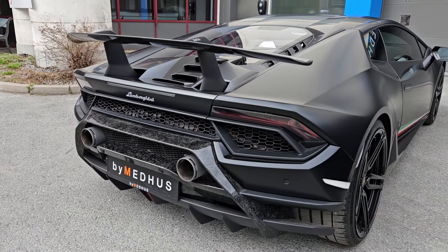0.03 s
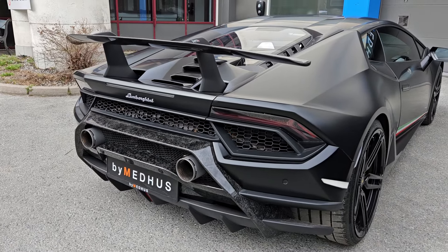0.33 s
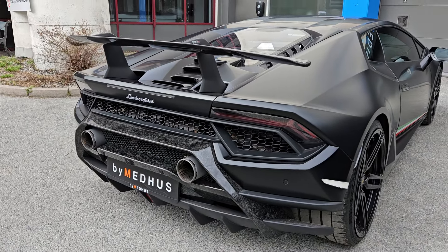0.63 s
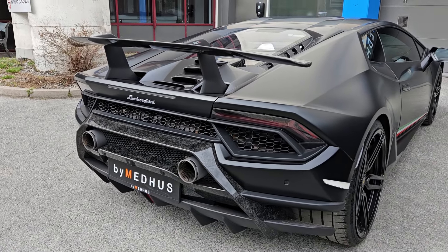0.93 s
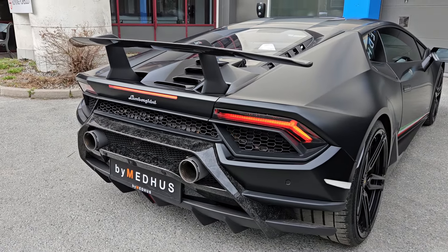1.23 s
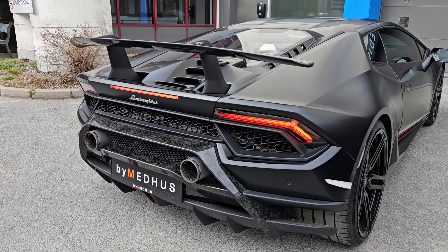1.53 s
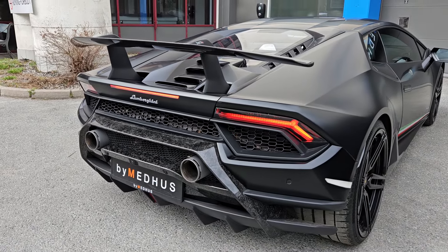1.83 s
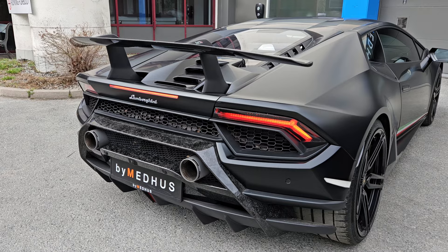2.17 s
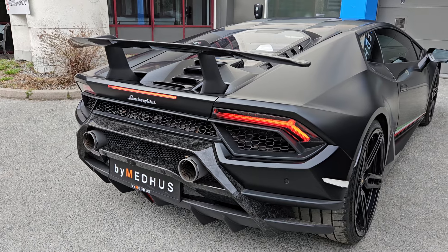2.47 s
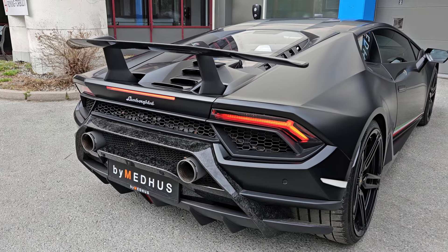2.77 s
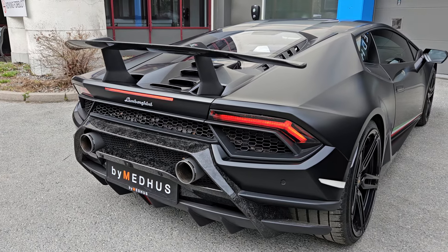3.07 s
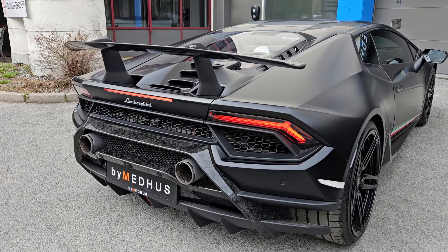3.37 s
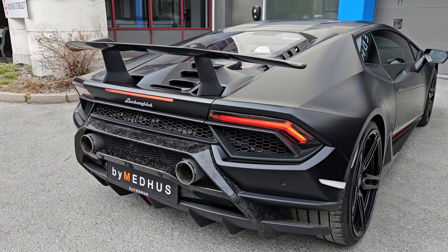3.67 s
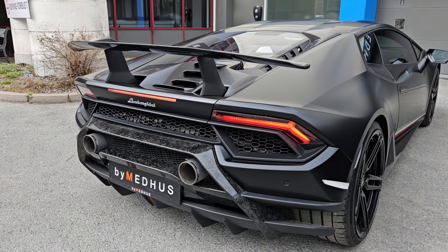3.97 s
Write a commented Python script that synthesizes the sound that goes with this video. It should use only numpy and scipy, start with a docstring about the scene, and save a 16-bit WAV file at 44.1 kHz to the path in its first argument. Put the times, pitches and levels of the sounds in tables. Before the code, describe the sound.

A sports car cranks and fires up close by after a quieter outdoor rumble.

```python
"""A sports car starts on an outdoor lot, the stereo microphone just behind its tailpipes.
First, over distant rumble and small ticks, another vehicle out of sight runs slowly and revs once,
its firings ringing its exhaust. At 3.1 s the starter clacks in and cranks: gear teeth rattle the
housing and the cylinders pump air. At 3.75 s the engine catches with a few deep thumps and flares up,
barking and spitting through the pipes, with a short echo from the buildings."""
import sys
import numpy as np
from scipy import signal
from scipy.fft import rfft, irfft, next_fast_len
from scipy.io import wavfile
from scipy.ndimage import map_coordinates

SR = 44100
rng = np.random.default_rng(int(sys.argv[2]) if len(sys.argv) > 2 else 0)


def to_wav(sig):
    """Store sig (one row per channel, or 1-D mono) as 16-bit WAV at the path in sys.argv[1].

    Samples outside -1..1 are clipped; the rate is SR.
    """
    pcm = np.clip(np.atleast_2d(sig), -1, 1) * 32767
    pcm = np.round(pcm).astype(np.int16)
    wavfile.write(sys.argv[1], SR, pcm.T)  # frames by channels


N = 176400
TIME_S = np.arange(N) / SR


def amp(db):
    """Decibels to gain."""
    return 10 ** (np.asarray(db) / 20)


def unit(x):
    """Scale to rms 1."""
    return x / np.sqrt(np.mean(x ** 2) + 1e-20)


def along(points, hz):
    """Read (freq_hz, value) points on a log frequency axis."""
    freqs, values = np.transpose(points)
    return np.interp(np.log(hz + 1), np.log(freqs + 1), values)


def curves(rows):
    """One value per sample for each column after the time."""
    times, *columns = np.transpose(rows)
    return [np.interp(TIME_S, times, column) for column in columns]


def wobble(rate):
    """A smooth random curve, rate knots a second."""
    return map_coordinates(rng.standard_normal(int(N * rate / SR) + 4), [TIME_S * rate])


def filtered(x, response):
    """Filter x by a complex response of frequency."""
    size = 2 * next_fast_len(N * 2 // 3)
    return irfft(rfft(x, size) * response(np.fft.rfftfreq(size, 1 / SR)), size)[..., :N]


def resonate(x, spectrum):
    """Ring x through a causal filter shaped by (freq_hz, gain_db) points."""
    def minimum_phase(hz):
        cepstrum = irfft(np.log(amp(along(spectrum, hz)) + 1e-6))
        half = len(cepstrum) // 2
        cepstrum[1:half] *= 2
        cepstrum[half + 1:] = 0
        return np.exp(rfft(cepstrum))
    return filtered(x, minimum_phase)


def noise(spectrum, likeness, pan, gate=1):
    """Gated stereo noise of rms 1 with a colour, a width and a balance."""
    def spread(hz):
        angle = np.arccos(np.clip(along(likeness, hz), -1, 1)) / 2
        return np.array([np.cos(angle), np.sin(angle)])
    mid, side = filtered(resonate(rng.standard_normal((2, N)) * gate, spectrum), spread)
    pair = np.array([mid + side, mid - side])
    return unit(filtered(pair, lambda hz: amp(np.outer([.5, -.5], along(pan, hz)))))


def beats(turns):
    """Samples at which a count of turns passes a whole number."""
    return np.flatnonzero(np.diff(np.floor(turns)) > 0)


def pulses(turns, scatter_db):
    """One pulse a turn, of scattered size."""
    at = beats(turns)
    return np.bincount(at, amp(scatter_db * rng.standard_normal(len(at))), N)


def strike(start_s, t60_s, attack_s):
    """Envelope of a blow: a quick rise, then 60 dB down in t60_s."""
    age = np.maximum(TIME_S - start_s, 0)
    return (1 - np.exp(-age / attack_s)) * amp(-60 * age / t60_s)


# The lot, far from the microphone.
RUMBLE_SPECTRUM = [(20,-0.5),(40,-5.5),(70,3),(130,2),(270,-6.5),(500,-12),(800,-19.5),(1300,-52)]  # freq_hz, gain_db
RUMBLE_LIKENESS = [(60, 0.88), (150, 1), (380, 0.86), (950, 0.23), (2380, -0.27), (5980, -0.38),
                   (15000, -0.71)]  # freq_hz, left_right_correlation
LOT_PAN = [(60, 3.5), (150, -2), (380, 0), (950, -1.0), (2380, -7.5), (5980, -3), (15000, 6)]  # freq_hz, left_minus_right_db


def distant_rumble():
    """A steady low rumble behind everything."""
    return amp(-34) * noise(RUMBLE_SPECTRUM, RUMBLE_LIKENESS, LOT_PAN)


# Small sounds around the lot.
KNOCKS = [(.297,-29,1500,.055),(.547,-40,10000,.055),(.851,-32,2200,.045),(.883,-33.5,1300,.05),(1.505,-32,1050,.03),(2.245,-31,3000,.03)]  # start_s, level_db, centre_hz, t60_s
KNOCK_SHAPE = [(.2,-30),(.6,-8),(1,0),(1.4,-9),(2.2,-22),(7,-44)]  # ratio_to_centre, gain_db
SHARP_TICKS = [(.642,-46),(1.357,-49),(1.460,-47),(1.471,-47.5),(1.493,-47),(1.508,-45.5),(1.710,-45.5),(2.101,-44),(2.245,-42.5)]  # start_s, level_db
TICK_SPECTRUM = [(3000,-20),(7500,0),(12000,-2),(15600,-10)]  # freq_hz, gain_db
LOT_LIKENESS = [(500,0.12),(2000,0.45),(8000,0.088)]  # freq_hz, left_right_correlation


def knocks_and_ticks():
    """Faint knocks and finer ticks, each a burst of noise that dies quickly."""
    knocks = 0
    for start_s, db, centre_hz, t60_s in KNOCKS:
        spectrum = [(centre_hz * ratio, gain) for ratio, gain in KNOCK_SHAPE]
        knocks += amp(db) * strike(start_s, t60_s, .0003) * noise(spectrum, LOT_LIKENESS, LOT_PAN)
    ticks = sum(amp(db) * strike(s, t60_s=.016, attack_s=.0002) for s, db in SHARP_TICKS)
    return knocks + ticks * noise(TICK_SPECTRUM, LOT_LIKENESS, LOT_PAN)


# The exhaust of the vehicle out of sight.
HUM_LEVELS = [(0,-33,-42,-31,-42,-37),(.25,-31,-44,-38,-46,-44),(.55,-29,-44,-29,-44,-36),(.85,-32,-44,-34,-46,-42),(1.1,-34,-48,-44,-48,-46),(1.52,-33,-48,-36,-48,-44),(1.68,-33,-48,-42,-48,-43),(1.85,-27,-46,-39,-46,-43),(2.03,-26,-40,-33,-42,-35),(2.15,-27,-27,-20,-36,-32),(2.42,-18,-23,-17,-34,-25),(2.58,-25,-27,-19,-31,-33),(2.8,-34,-29,-19,-24,-30),(3.07,-38,-32,-22,-27,-29),(3.12,-31,-44,-42,-44,-41)]  # time_s, then level_db of engine orders 2 to 6
RING_LEVELS = [(0,-53,-52.5,-55),(.32,-53,-52,-52),(.5,-68,-41.5,-56),(.8,-40.5,-41.5,-57),(1.1,-39,-53,-52.5),(1.7,-40,-54,-62),(2.031,-39.5,-45,-50),(2.13,-30.5,-39.5,-46),(2.45,-34,-34.5,-41.5),(2.6,-33.5,-31,-43),(2.72,-28,-27.5,-39.5),(2.86,-38.5,-32,-45.5),(3.08,-33,-29,-45),(3.12,-42,-40.5,-49)]  # time_s, low_db, middle_db, high_db
PIPE_RINGS = [391.6, 438.1, 644]  # pitch_hz of the low, middle and high resonance
RING_SHAPE = [(.4,-61),(.8,-20),(.95,-3.5),(1,6.5),(1.05,-0.5),(1.2,-25),(2.6,-64),(6,-110)]  # ratio_to_pitch, gain_db
DRONE_LEVEL = [(0,-37),(.7,-47.5),(1,-43),(1.7,-43.5),(2,-41.5),(2.2,-30),(2.45,-34),(2.7,-30.5),(3.08,-36.5),(3.15,-40.5),(4,-42)]  # time_s, level_db
DRONE_SPECTRUM = [(60,-31.5),(120,1),(155,-0.5),(185,3.5),(230,3.5),(290,-7),(400,-25.5),(1200,-110)]  # freq_hz, gain_db


def other_exhaust(turns):
    """An uneven engine: low orders hum, and its strong and weak firings ring the pipe."""
    hum = 0
    for order, db in enumerate(curves(HUM_LEVELS), 2):
        pipe_delay_rad = .75 * order ** 2
        hum += np.sqrt(2) * amp(db + wobble(22.41)) * np.cos(2 * np.pi * order * turns - pipe_delay_rad)
    hum *= np.interp(TIME_S, [3.15, 3.7], [1, .6])
    strong = pulses(turns, scatter_db=1)
    weak = .25 * pulses(turns + .5 - .07, scatter_db=2)  # 0.07 cycle later than halfway
    firings = unit(strong + weak) + .2 * rng.standard_normal(N)
    ring = 0
    for pitch_hz, db in zip(PIPE_RINGS, curves(RING_LEVELS)):
        ring += amp(db) * unit(resonate(firings, [(pitch_hz * r, gain) for r, gain in RING_SHAPE]))
    drone = amp(curves(DRONE_LEVEL)[0]) * unit(resonate(firings, DRONE_SPECTRUM))
    return hum + ring + drone


# The same vehicle's machinery, off across the lot.
HISS_LEVELS = [(0,-44.5,-61),(.3,-41,-56.5),(.62,-39,-51),(1.1,-40.5,-53),(1.6,-41.5,-54),(2.05,-38.5,-50.5),(2.25,-37,-47),(2.6,-38,-51),(3.1,-42,-53.5)]  # time_s, hiss_db, treble_db
HISS_SPECTRUM = [(440, -3), (750, -0.5), (836, -2.5), (1050, -1.5), (1250, -5), (1780, -7), (1940, -4),
                 (2040, -1), (2370, -7.5), (3200, -8), (3450, -10.5), (4320, -13), (5500, -30), (7150, -67),
                 (12100, -120)]  # freq_hz, gain_db
TREBLE_SPECTRUM = [(2650,-31.5),(4500,3.5),(5400,-0.5),(7200,-1.5),(8900,-9),(9700,-20),(12000,-11.5),(15600,-31)]  # freq_hz, gain_db
WHIRR = [(.2,1700,-55),(.5,2530,-50),(.85,3159,-53),(1.3,3100,-63),(1.8,3176,-72)]  # time_s, pitch_hz, level_db


def other_machinery(turns):
    """Clattering mechanical hiss, and a faint whirr that rises and settles."""
    hiss_db, treble_db = curves(HISS_LEVELS)
    clatter = amp(.27 * np.cos(4 * np.pi * turns) + .93 * wobble(150))
    hiss = amp(hiss_db) * noise(HISS_SPECTRUM, LOT_LIKENESS, LOT_PAN, clatter)
    treble = amp(treble_db) * noise(TREBLE_SPECTRUM, LOT_LIKENESS, LOT_PAN, clatter)
    whirr_hz, whirr_db = curves(WHIRR)
    blur = wobble(340) + 1j * wobble(340)  # widens the tone to a narrow band
    whirr = amp(whirr_db) * np.real(blur * np.exp(2j * np.pi * np.cumsum(whirr_hz) / SR))
    return hiss + treble + whirr


# That vehicle's speed, its bearing from the microphone and its thin whine.
OTHER_SPEED = [(0,27.8),(.12,26.3),(.25,25.7),(.55,26.8),(.75,25.5),(1,23.7),(1.3,22.4),(1.68,24.2),(1.82,25),(1.98,28),(2.1,31),(2.25,33.6),(2.42,37),(2.52,33.9),(2.62,32.1),(2.76,29),(2.86,27),(3.05,27),(3.2,27.5)]  # time_s, cycle_rate_hz
OTHER_LAG = [(.7,-7),(1.6,-21),(2.9,-23),(3.3,-10)]  # time_s, left_lag_samples (negative: left leads)
WHINE_LEVEL = [(0,-51),(.33,-42.5),(.45,-48),(1.66,-61),(1.76,-41),(1.9,-65)]  # time_s, level_db


def other_vehicle():
    """It runs slowly and revs once, its sound reaching the left channel first."""
    def placed(pair, lag):
        return np.array([map_coordinates(channel, [np.arange(N) + side * lag])
                         for channel, side in zip(pair, (-.5, .5))])
    cycle_hz, = curves(OTHER_SPEED)
    lag, = curves(OTHER_LAG)
    turns = .5 + np.cumsum(cycle_hz * (1 + .005 * wobble(25))) / SR
    exhaust = placed([other_exhaust(turns)] * 2, .43 * lag)  # the low note lags less
    machinery = placed(other_machinery(turns), lag)
    whine = amp(curves(WHINE_LEVEL)[0]) * np.sin(2 * np.pi * 633 * TIME_S + .5 * wobble(24))
    return exhaust + machinery + whine


def building_echo(x, t60_s=.18, delay_s=.012):
    """A short, thin echo from the buildings around the lot."""
    t = np.arange(SR // 2) / SR
    tail = rng.standard_normal((2, len(t))) * amp(-60 * t / t60_s) * (t > delay_s)
    echo = signal.fftconvolve(x, tail / np.linalg.norm(tail[0]), axes=1)[:, :N]
    return filtered(echo, lambda hz: amp(along([(120, -5), (500, 1.5), (4000, 2), (14000, -1)], hz)))


# The sports car's stereo image, close up.
CAR_LIKENESS = [(60, 1), (380, 0.81), (950, 0.44), (2380, 0.054), (5980, -0.11), (15000, 0.019)]  # freq_hz, left_right_correlation
CAR_PAN = [(150, -1.5), (380, 1.5), (950, -2.5), (2380, 3.5), (5000, -8), (8000, -2), (13000, 4)]  # freq_hz, left_minus_right_db


def car_noise(spectrum, gate=1):
    """Noise with the width and balance of the car."""
    return noise(spectrum, CAR_LIKENESS, CAR_PAN, gate)


# The starter engaging, heard from behind the car.
CLACKS = [(3.131,-24.5,0.065),(3.139,-16.5,0.1),(3.161,-19,0.045)]  # start_s, level_db, t60_s
CLACK_SPECTRUM = [(240, -34), (400, 1), (705, -14), (1050, -3), (1500, -16), (1610, -5.5), (2260, -11),
                  (2940, -10.5), (4240, -9), (4800, -3), (6820, -11.5), (12600, -21), (15600, -29)]  # freq_hz, gain_db


def starter_clack():
    """The pinion clacks in with three quick blows."""
    blows = sum(amp(db) * strike(s, t60_s, attack_s=.0031) for s, db, t60_s in CLACKS)
    return blows * car_noise(CLACK_SPECTRUM, gate=amp(1.3 * wobble(700)))


# The starter's gears and their housing.
CRANK_LEVEL = [(3.13,-80),(3.16,-26),(3.2,-36.5),(3.335,-38),(3.368,-32.5),(3.43,-37.5),(3.452,-34),(3.497,-42.5),(3.51,-32),(3.555,-32.5),(3.612,-38.5),(3.635,-30.5),(3.66,-32),(3.69,-35.5),(3.74,-38),(3.78,-30.5),(3.9,-47)]  # time_s, level_db
GEAR_SPECTRUM = [(180, -24), (300, -8), (426, -3.5), (541, -35.5), (653, -8.5), (721, -11), (1060, -7.5),
                 (1350, -9.5), (2340, -6.5), (3680, -20.5), (6000, -24), (7800, -52), (13200, -120)]  # freq_hz, gain_db
FIZZ_SPECTRUM = [(2940, -4.5), (5000, -1.5), (6170, -7.5), (7050, -8.5), (9650, -15), (12000, -14.5),
                 (15600, -31)]  # freq_hz, gain_db
HOUSING_MODES = [(661.7, 27, 0), (853, 24, 3), (1074.8, 22, 8), (1241, 24, 2.5), (1457, 28, 4.5),
                 (1910, 40, -3), (2223, 37, 2), (2357, 42, 4), (3106, 54, -1.5), (4730, 39, -8.5)]  # pitch_hz, width_hz, gain_db


def starter_gears(mesh_hz=203.6):
    """Gear teeth whirr and rattle the housing, surging with each compression."""
    def housing(hz):
        return (hz < 6500) * sum(amp(db) * 1j * hz * width / (pitch ** 2 - hz ** 2 + 1j * hz * width)
                                 for pitch, width, db in HOUSING_MODES)
    turns = np.cumsum(mesh_hz * (1 + .1 * wobble(40))) / SR
    # The level swings with each tooth, a fast rattle and a slow shudder.
    teeth = amp(1.5 * np.cos(2 * np.pi * turns) + 2.3 * wobble(130) + 1.6 * wobble(30))
    impacts = teeth * (unit(pulses(turns, scatter_db=1)) + rng.standard_normal((2, N)))
    ring = amp(-2.5) * unit(filtered(impacts, housing))
    whirr = car_noise(GEAR_SPECTRUM, teeth)
    fizz = amp(-5.5 + 11 * (TIME_S - 3.5)) * car_noise(FIZZ_SPECTRUM, teeth)  # brightens as it cranks
    return amp(curves(CRANK_LEVEL)[0]) * (whirr + ring + fizz)


def thump(start_s, pitch_hz, rise_s=.0031, hold_s=.005, fall_s=.0073):
    """A slug of gas sets the tailpipe swinging for a cycle or two."""
    age = TIME_S - start_s
    rise = np.exp(-(np.minimum(age - hold_s / 2, 0) / rise_s) ** 2)
    fall = np.exp(-np.maximum(age - hold_s, 0) / fall_s)
    return -rise * fall * np.cos(2 * np.pi * pitch_hz * age)


# Unfired air leaving the tailpipes, right at the microphone.
CHURN_SPECTRUM = [(25,-36.5),(55,9.5),(110,5.5),(170,6.5),(260,0),(380,-3),(480,-10.5),(800,-35.5)]  # freq_hz, gain_db
PUFFS = [(3.132,-22,94),(3.183,-41,107),(3.392,-14.5,42.12),(3.451,-20,44.9),(3.533,-16.5,49.12)]  # start_s, level_db, pitch_hz


def pumped_air():
    """A low churn swells and the pipes puff as the cranked cylinders pump air."""
    swell = np.interp(TIME_S, [3.12, 3.17, 3.55, 3.75], [.14, 1, .6, .68])
    puffs = sum(amp(db) * thump(s, hz) for s, db, hz in PUFFS)
    return amp(-30) * swell * car_noise(CHURN_SPECTRUM) + puffs


# The engine running up, just ahead of the microphone.
RUN_UP = [(3.75,39.6,92,-5,-41,-43,-32.5),(3.778,33,100,1,-41,-46.5,-30.5),(3.797,30.8,110,-8,-36,-35,-31),(3.822,42,142,5,-35,-25,-26),(3.843,51,162,-10.5,-14,-26,-26.5),(3.878,61.6,202,-8,-18,-23,-30),(3.92,72.2,220,-17,-11.5,-23.5,-28),(3.96,90.6,222,-15,-14.5,-22,-33.5),(4,94,234,-21,-16.5,-26,-33)]  # time_s, firing_hz, pipe_hz, thump_db, boom_db, rasp_db, spit_db
RASP_SPECTRUM = [(200,-28),(330,-9.5),(430,-10),(520,2),(590,-9),(680,-4.5),(800,-12.5),(950,-12),(1130,-8),(1350,-30),(1550,-15.5),(2000,-29.5),(3000,-34.5)]  # freq_hz, gain_db
SPIT_SPECTRUM = [(820, -47), (1400, -10.5), (1550, -2), (1930, -13.5), (2250, 3), (2780, -13.5), (3330, -5),
                 (3880, -12), (4610, -7.5), (5100, -10), (5690, -4.5), (7710, -16), (9620, -16.5),
                 (12800, -18), (15600, -34.5)]  # freq_hz, gain_db


def engine(catch_s=3.7525):
    """Single thumps speed up into a boom; each firing drives a gust of rasp and spit down the pipes."""
    firing_hz, pipe_hz, thump_db, boom_db, rasp_db, spit_db = curves(RUN_UP)
    turns = np.cumsum(firing_hz) / SR
    turns -= np.interp(catch_s, TIME_S, turns)  # zero at the first firing
    alight = np.clip(2 * turns + 1, 0, 1)
    firings = beats(np.maximum(turns, -.5))
    thumps = sum(amp(thump_db[i]) * thump(TIME_S[i], pipe_hz[i]) for i in firings)
    boom = -np.sqrt(2) * amp(boom_db) * np.cos(2 * np.pi * turns)
    gust_db = 4.6 * np.cos(2 * np.pi * (turns - .2)) + .82 * np.cos(4 * np.pi * turns)
    gust = amp(gust_db + .73 * wobble(600))
    rasp = amp(rasp_db) * car_noise(RASP_SPECTRUM, gust)
    spit = amp(spit_db) * car_noise(SPIT_SPECTRUM, gust)
    return thumps + alight * (boom + rasp + spit)


# Hard firings at the mouth of the tailpipes.
BARKS = [(3.789,-17,1070,-15),(3.814,-16.5,453,-23),(3.837,-10,512,-18),(3.8505,-9.5,524,-28.5),(3.8575,-10,518,-23.5),(3.884,-10.5,517,-33),(3.8895,-11.5,542,-25.5),(3.9283,-4.5,600,-19),(3.9405,-6,502,-24.5),(3.9805,-6.5,492,-28)]  # start_s, bark_db, pitch_hz, crack_db


def exhaust_barks():
    """Each hard firing rings the pipes with a gritty note and a bright crack."""
    grit = amp(-5.5) * car_noise(RASP_SPECTRUM)
    spit = car_noise(SPIT_SPECTRUM)
    barks = 0
    for start_s, bark_db, pitch_hz, crack_db in BARKS:
        ring = -np.sin(2 * np.pi * pitch_hz * (TIME_S - start_s))
        barks += amp(bark_db) * strike(start_s, t60_s=.04, attack_s=.0017) * (ring + grit)
        barks += amp(crack_db) * strike(start_s, t60_s=.036, attack_s=.0012) * spit
    return barks


def scene():
    """The lot and the other vehicle behind, the sports car close by."""
    background = distant_rumble() + knocks_and_ticks() + other_vehicle()
    car = starter_clack() + starter_gears() + pumped_air() + engine() + exhaust_barks()
    return background + amp(-16.5) * building_echo(car) + car


def record(dry, top_hz=15850):
    """The recorder rounds off peaks near full scale and keeps nothing above its band limit."""
    rounded = dry / (1 + np.abs(dry) ** 8) ** (1 / 8)
    return filtered(rounded, lambda hz: hz < top_hz)


dry = scene()
out = record(dry)
to_wav(out)
```